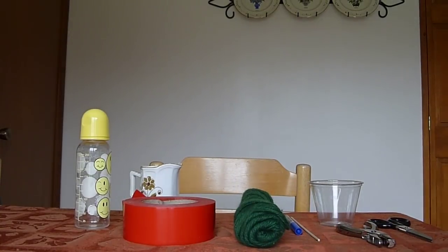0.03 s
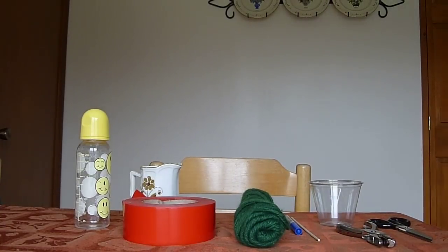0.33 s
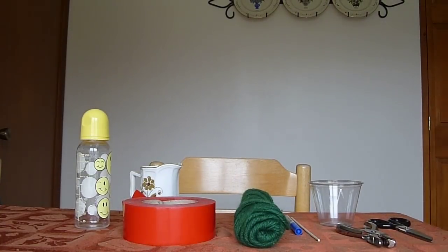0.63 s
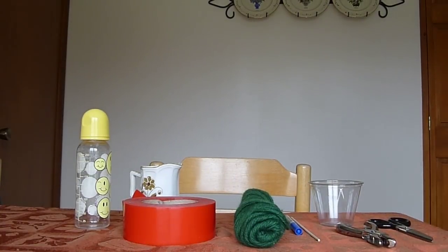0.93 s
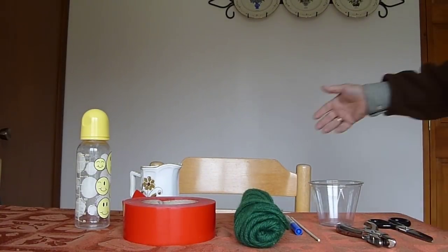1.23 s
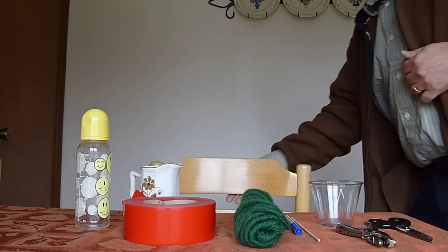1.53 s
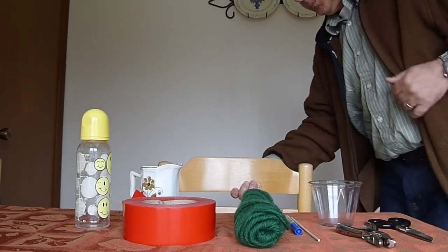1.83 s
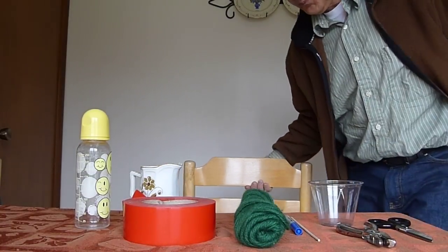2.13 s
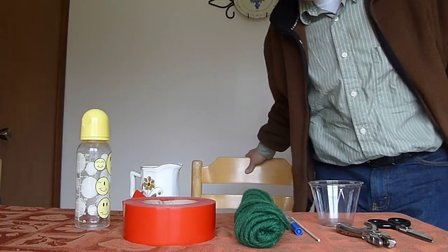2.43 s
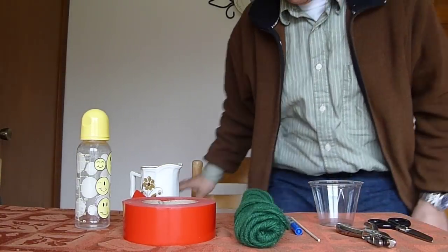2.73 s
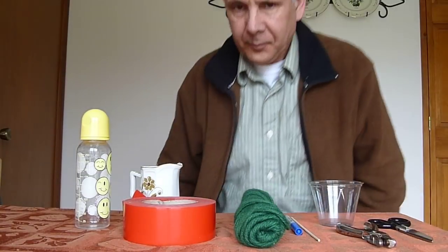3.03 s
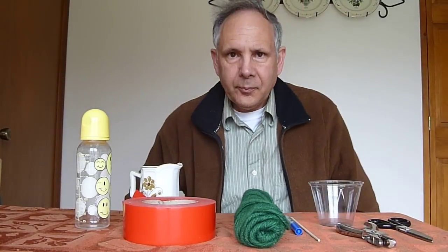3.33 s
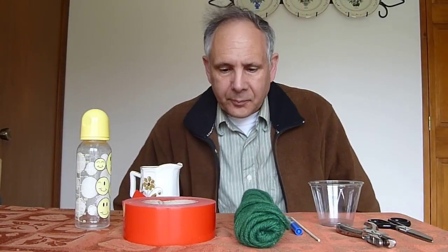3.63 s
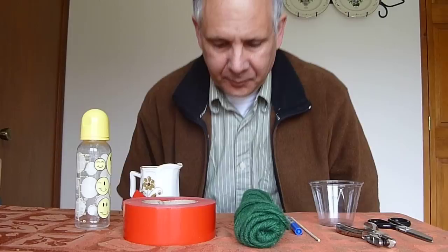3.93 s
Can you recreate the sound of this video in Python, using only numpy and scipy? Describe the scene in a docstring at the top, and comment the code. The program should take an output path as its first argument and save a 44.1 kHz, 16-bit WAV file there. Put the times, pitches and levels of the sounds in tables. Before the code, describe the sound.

A wooden chair scrapes across a room's floor, with soft footsteps and a dull table knock.

```python
"""Steady room hiss, a rustling jacket and nearby steps, on one microphone in a small, fairly live room.
A man comes up to a dining table, boards thudding under his weight, grips a wooden chair and drags it back.
The legs stick and slip over grit, so the frame groans and its joints clack. He sits down and bumps the
table with a dull knock. Low sounds arrive through floor and table; sharp contacts ring in the room."""
import sys
import numpy as np
from scipy import signal
from scipy.fft import rfft, irfft
from scipy.io import wavfile
from scipy.ndimage import uniform_filter1d

SR = 44100
rng = np.random.default_rng(int(sys.argv[2]) if len(sys.argv) > 2 else 0)


def store_pcm(level_fs):
    """Save levels as 16-bit WAV."""
    pcm = np.round(np.clip(level_fs, -1, 1) * 32767).astype(np.int16)
    wavfile.write(sys.argv[1], SR, np.atleast_2d(pcm).T)


N = 176400
TIME = np.arange(N) / SR

# colours of the noisy sounds, each (frequency [Hz], relative density [dB])
ROOM_TONE_COLOUR = [(20, -24), (50, 0.5), (95, -3.5), (150, -2), (218, 2.5), (300, -3), (400, -5),
                    (650, -10.5), (1000, -13), (1800, -18.5), (3500, -23), (7000, -28), (8500, -44)]
CLOTH_COLOUR = [(80, -7), (250, 1), (550, 7), (900, -1), (1500, -4.5), (2500, -10), (4000, -15),
                (7000, -21), (8500, -41)]
THUMP_COLOUR = [(30, -15), (70, -2), (140, 4), (270, 1), (420, -23), (1000, -23), (3000, -41.5),
                (8000, -68)]
TAP_COLOUR = [(100, -6), (350, 7), (600, 1), (850, 0.5), (1300, -9.5), (2500, -27), (8000, -73)]
SLAP_COLOUR = [(100, -2.5), (400, -6.5), (700, -7.5), (1100, -9), (1680, -2), (2000, -21.5), (2700, -16),
               (4500, -23), (6100, -16), (8500, -42.5)]
GRIT_COLOUR = [(60, -7.5), (250, 1), (500, 7.5), (800, -0.5), (1200, -1), (1700, -4), (2300, -6.5),
               (3500, -12), (5000, -18), (6800, -17.5), (8500, -37)]
CLACK_COLOUR = [(100, -8.5), (300, -1.5), (650, -3.5), (1000, 3), (2000, 0), (3200, 1.5), (4500, -6),
                (6500, -7), (8500, -27)]
# modes of chair frame, floorboards, backrest and table, each (frequency [Hz], relative level [dB], t60 [s])
FRAME_MODES = [(56.7, -14, 0.58), (82.8, -13, .13), (131.9, -1.5, 0.2), (183, -4, 0.26), (215.5, .5, 0.2),
               (261.4, -1, 0.13), (303, -9.5, 0.13), (384, -17, .2), (445, -21, .18), (544, -23, 0.13)]
BOARD_MODES = [(53, 1, .36), (62.9, -6, 0.35), (87, -10, .2), (131.8, -4, 0.41)]
BACKREST_MODES = [(877, -8, .25), (1160, -9, .25), (1580, -11, .18), (1668, 1, .24), (2694, -11, 0.23)]
TABLE_MODES = [(86, -8.5, .25), (132.7, -4, 0.79), (206, -4, 0.14), (257.2, 2, 0.25), (287, -5, 0.085)]
# jacket and soles brush (start [s], length [s], level [dB])
BRUSH_STROKES = [(0.015, 0.34, -44), (0.4, 0.14, -53), (1.072, 0.23, -43.5), (1.262, 0.23, -49.5),
                 (3.778, 0.13, -43.5), (3.901, 0.14, -40.5)]
# faint creaks of soles, boards and cloth (start [s], length [s], level [dB], centre [Hz], half-width [Hz])
NARROW_RUBS = [(0.064, 0.16, -40, 215, 8.3), (0.049, 0.072, -40, 370, 62), (0.229, 0.15, -38, 218.4, 4),
               (0.278, 0.06, -49.5, 2130, 300), (0.426, 0.17, -55.5, 3500, 890),
               (.908, 0.03, -36.5, 308, 52), (1.363, 0.13, -39.5, 301, 27), (1.528, 0.21, -59.5, 4250, 150),
               (1.756, 0.047, -29, 267, 31), (1.926, 0.12, -37.5, 524, 90), (2.787, 0.16, -43, 261, 26)]
# nearby steps and jolts of the chair (time [s], ring [dB], thump [dB], thump fade [s])
WOOD_KNOCKS = [(0.058, -36, -33.5, 0.031), (0.243, -36, -46.5, .04), (1.758, -27.5, -34, .025),
               (2.159, -15, -33, .015), (2.267, -25, -30, 0.0093), (2.817, -44, -47, 0.028)]
# light shoe taps (time [s], relative level [dB], fade [s])
SHOE_TAPS = [(.215, -34, 0.016), (.687, -33.5, 0.016), (1.195, -42, 0.02), (2.774, -26, 0.0041)]
# heavy footfalls (time [s], push level [dB], push length [s], heel thump [dB])
HEAVY_STEPS = [(0.871, -31, 0.0061, -36.5), (.881, -18, 0.007, -34.5), (.901, -18, 0.0052, -38.5),
               (1.799, -28.5, 0.0088, -46), (3.802, -18, 0.0076, -42.5), (3.823, -17, 0.011, -34.5),
               (3.926, -37, 0.0079, -40)]
# the hand lands on the backrest (time [s], relative level [dB], fade [s])
HAND_SLAPS = [(1.675, -23.5, .007), (1.686, -25.5, .011), (1.733, -48.5, .006)]
# the frame's groan during the pull (time [s], level [dB])
GROAN_LEVELS = [(1.745, -43), (1.765, -34), (1.79, -31), (1.84, -42), (1.91, -32), (1.99, -28.5),
                (2.06, -28.5), (2.09, -21.5), (2.19, -23), (2.28, -22), (2.37, -28.5), (2.42, -38),
                (2.6, -47), (2.75, -50)]
# grit under the sliding legs (time [s], relative level [dB])
GRIT_LEVELS = [(1.72, -50), (1.83, -44), (1.92, -42), (1.97, -37), (2.05, -38.5), (2.21, -32.5),
               (2.3, -35.5), (2.43, -41), (2.65, -42), (2.73, -50.5), (2.9, -52.5), (3.2, -54)]
# the chair's joints clack (time [s], relative level [dB], fade [s])
JOINT_CLACKS = [(1.805, -28, 0.0094), (2.086, -34, 0.011), (2.099, -36.5, 0.036), (2.127, -44.5, 0.0056),
                (2.303, -36, 0.028), (2.378, -28, 0.012), (2.455, -28, 0.013), (3.534, -32.5, 0.013)]
# he bumps the table as he settles (time [s], push level [dB])
TABLE_BUMPS = [(3.9648, -11), (3.9713, -3.5)]
# the room's reverberation (frequency [Hz], t60 [s])
ROOM_DECAY = [(100, 0.38), (500, 0.16), (1500, 0.4), (3500, 0.46), (8000, 0.13)]

SLIPS_PER_S, SLIP_JITTER, SLIP_SPREAD_DB = 41, .22, .5
GRAINS_PER_S, GRAIN_SPREAD_DB = 9000, 1.5
GRIT_FADE_S, GRIT_STEADY, GRIT_TRIM_DB = .0064, 3.3, -.5
FRAME_RISE_S, THUMP_RISE_S = .0039, .005
CONTACT_DIRECT_DB, CONTACT_ROOM_DB, GROAN_ROOM_DB = -3.5, -5.5, -9


def amp(db):
    """Decibels to gain."""
    return 10 ** (np.asarray(db) / 20)


def unit(x):
    """Scales to rms 1."""
    return x / np.sqrt(np.mean(x ** 2) + 1e-20)


def even_out(x, floor):
    """Holds the running rms near 1; floor is a tiny power that keeps silence silent."""
    return x / np.sqrt(abs(uniform_filter1d(x ** 2, size=3000)) + floor)


def read(points, hz):
    """Reads a table on a log-frequency axis."""
    f, value = np.transpose(points)
    return np.interp(np.log(hz + 1), np.log(f + 1), value)


def level(points):
    """Gain from (time [s], level [dB]) points, silent outside them."""
    return amp(np.interp(TIME, *np.transpose(points), left=-120, right=-120))


def swell(s, length, peak_share=.31):
    """Gain of one movement: up, then down."""
    return np.interp(TIME, [s, s + peak_share * length, s + length], [0, 1, 0])


def place(events):
    """Lays (time [s], sound) pairs on one track."""
    track = np.zeros(N)
    for s, sound in events:
        part = track[round(s * SR):][:len(sound)]
        part += sound[:len(part)]
    return track


def tint(x, colour):
    """Gives a signal a spectrum, at rms 1."""
    hz = np.fft.rfftfreq(len(x), 1 / SR)
    return unit(irfft(rfft(x) * amp(read(colour, hz)), len(x)))


def grains():
    """Dense tiny clicks of uneven size."""
    size = amp(GRAIN_SPREAD_DB * np.minimum(rng.exponential(1, N), 4))
    return size * rng.standard_normal(N) * (rng.random(N) < GRAINS_PER_S / SR)


def ring(modes):
    """The dying modes of a struck body, peak 1."""
    t = TIME[:SR // 2]
    x = sum(amp(db - 60 * t / t60) * np.sin(2 * np.pi * hz * t) for hz, db, t60 in modes)
    return x / abs(x).max()


def padded(x, push_s):
    """Softens a ring, as a blow that lasts push_s does."""
    push = np.sin(np.pi * np.minimum(TIME[:SR // 20] / push_s, 1))
    return signal.fftconvolve(x, push / push.sum())


def burst(colour, db, fade_s, rise_s):
    """A short rough contact: quick rise, exponential fade."""
    t = TIME[:SR // 2]
    envelope = np.minimum(t / rise_s, 1) * np.exp(-t / fade_s)
    return amp(db) * tint(rng.standard_normal(len(t)), colour) * envelope


def room_tone(start_db=-46, drift_db=.48, fall_db_per_s=.5):
    """Rumble and hiss around the microphone, wavering and slowly getting a little quieter."""
    drift = np.interp(TIME, np.linspace(0, N / SR, 40), rng.standard_normal(40))
    gain = amp(start_db - drift_db * drift - fall_db_per_s * TIME)
    return gain * tint(rng.standard_normal(N), ROOM_TONE_COLOUR)


def brushes():
    """Jacket and soles rub, a grainy noise that swells and fades with each movement."""
    gain = sum(amp(db) * swell(s, length) for s, length, db in BRUSH_STROKES)
    return gain * tint(grains(), CLOTH_COLOUR)


def rubs():
    """Friction excites one resonance in each faint creak."""
    hz, out = np.fft.rfftfreq(N, 1 / SR), np.zeros(N)
    for s, length, db, centre_hz, half_width_hz in NARROW_RUBS:
        resonance = 1 / (1 + ((hz - centre_hz) / half_width_hz) ** 2)
        rub = irfft(rfft(rng.standard_normal(N)) * resonance, N)
        out += amp(db) * swell(s, length) * even_out(rub, floor=1e-15)
    return out


def frame_ring():
    """The chair frame rings on the floor, taking a few milliseconds to build up."""
    x = ring(FRAME_MODES)
    return x * (1 - np.exp(-TIME[:len(x)] / FRAME_RISE_S))


def knocks():
    """Blunt blows from nearby steps and jolts of the chair thump and ring the wood."""
    return place((s, amp(ring_db) * frame_ring() + burst(THUMP_COLOUR, thump_db, fade_s, THUMP_RISE_S))
                 for s, ring_db, thump_db, fade_s in WOOD_KNOCKS)


def shoe_taps():
    """Shoes touch the floor lightly, each a short dull burst."""
    return place((s, burst(TAP_COLOUR, db, fade_s, rise_s=.0029)) for s, db, fade_s in SHOE_TAPS)


def footfalls():
    """The heel thumps and his weight pushes the floorboards, which boom briefly."""
    boards = place((s, amp(db) * padded(ring(BOARD_MODES), push_s)) for s, db, push_s, _ in HEAVY_STEPS)
    heels = place((s, burst(THUMP_COLOUR, heel_db, fade_s=.042, rise_s=THUMP_RISE_S))
                  for s, _, _, heel_db in HEAVY_STEPS)
    return boards + heels


def hand_on_backrest(ring_gain_db=-9):
    """The hand slaps the backrest and sets it ringing."""
    slaps = place((s, burst(SLAP_COLOUR, db, fade_s, rise_s=.0036)) for s, db, fade_s in HAND_SLAPS)
    wood = place((s, amp(db + ring_gain_db) * ring(BACKREST_MODES)) for s, db, _ in HAND_SLAPS)
    return slaps + wood


def chair_drag():
    """Two legs stick and slip unevenly; each slip shakes the frame and grinds grit."""
    slips = np.zeros(N)
    for leg in range(2):
        gap, size = rng.standard_normal((400, 2)).T
        at = (np.cumsum(np.exp(SLIP_JITTER * gap)) / SLIPS_PER_S * SR).astype(int)
        slips[at[at < N]] += amp(SLIP_SPREAD_DB * size[at < N])
    shake = signal.fftconvolve(slips, frame_ring())[:N]
    groan = even_out(shake, floor=1e-9) * level(GROAN_LEVELS)
    grind = unit(signal.lfilter([1], [1, -np.exp(-1 / (GRIT_FADE_S * SR))], slips))  # fades after a slip
    grit = tint(grains() * (GRIT_STEADY + grind), GRIT_COLOUR) * level(GRIT_LEVELS)
    return groan, amp(GRIT_TRIM_DB) * grit


def joint_clacks():
    """The chair's joints knock together in short bright bursts."""
    return place((s, burst(CLACK_COLOUR, db, fade_s, rise_s=.0069)) for s, db, fade_s in JOINT_CLACKS)


def table_bumps():
    """The table answers a padded blow with a low boom."""
    boom = padded(ring(TABLE_MODES), push_s=.0029)
    return place((s, amp(db) * boom) for s, db in TABLE_BUMPS)


def room(x, delay_s=.004):
    """Diffuse reflections reach the microphone just after the direct sound; each band has its own decay."""
    noise = rng.standard_normal(SR // 2) * (TIME[:SR // 2] > delay_s)
    hz, t, bands = signal.stft(noise, SR, nperseg=256)
    decay = amp(-60 * t / read(ROOM_DECAY, hz)[:, None])
    tail = signal.istft(bands * decay, SR, nperseg=256)[1]
    return signal.fftconvolve(x, tail / np.linalg.norm(tail))[:N]


def moving_room(x, cycle_hz=2.3):
    """The reflections change as man and chair move: the sound crossfades around four room tails."""
    turn = 2 * np.pi * cycle_hz * TIME
    return sum(room(x * np.maximum(np.cos(turn - k * np.pi / 2), 0)) for k in range(4))


def scene():
    """At the microphone: all direct sounds, plus reflections of the groan and the sharp contacts."""
    groan, grit = chair_drag()
    contacts = hand_on_backrest() + joint_clacks() + shoe_taps()
    reflections = moving_room(amp(GROAN_ROOM_DB) * groan + amp(CONTACT_ROOM_DB) * contacts)
    friction = grit + brushes() + rubs()
    low_wood = groan + footfalls() + knocks() + table_bumps()
    return (low_wood + amp(CONTACT_DIRECT_DB) * contacts + reflections + friction + room_tone())[None]


def record(dry):
    """Behind the microphone: the recorder's band limit and its converter's small offset."""
    cutoff_hz, dc_offset = 8750, .021
    lowpass = signal.firwin(401, cutoff_hz, window=("kaiser", 9), fs=SR)
    return dc_offset + signal.oaconvolve(dry, lowpass[None], "same")


dry = scene()
out = record(dry)
store_pcm(out)
```